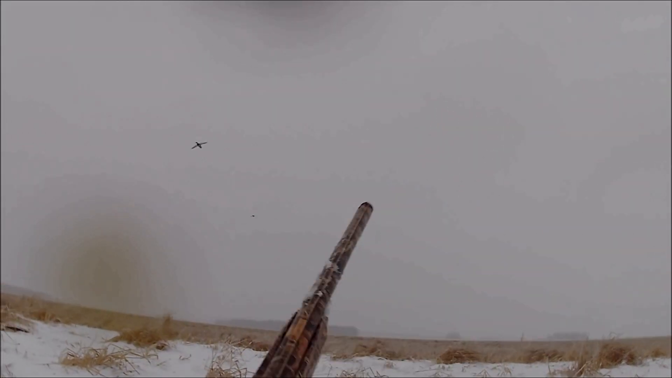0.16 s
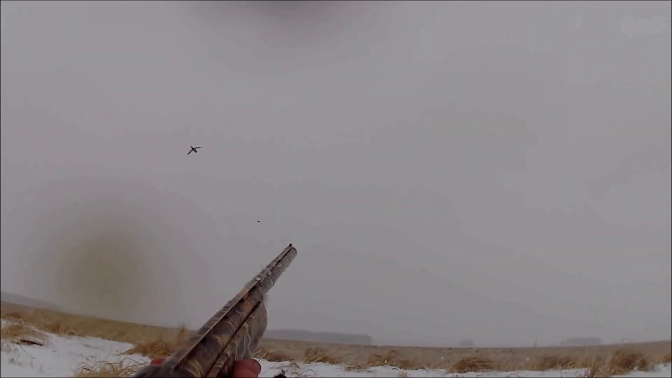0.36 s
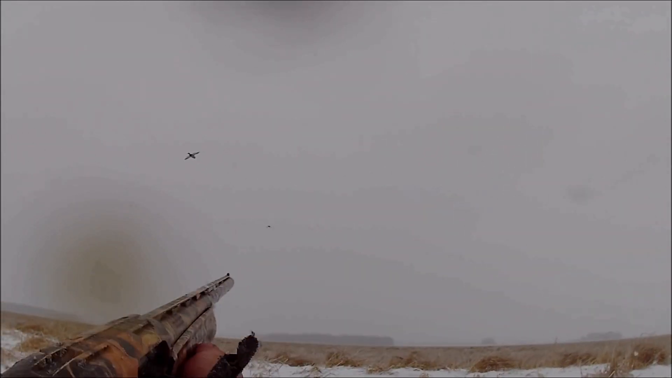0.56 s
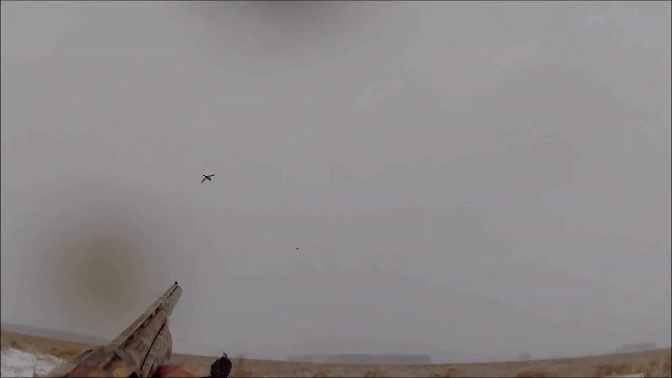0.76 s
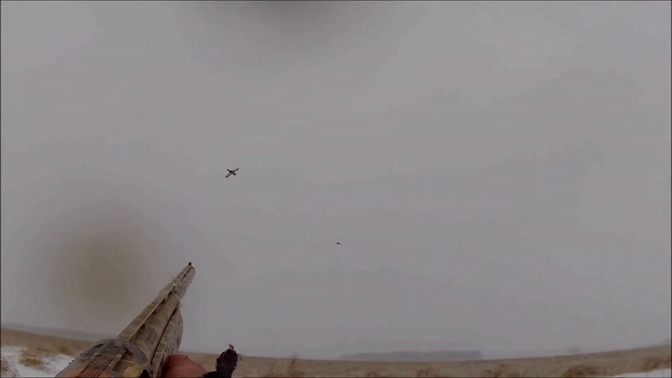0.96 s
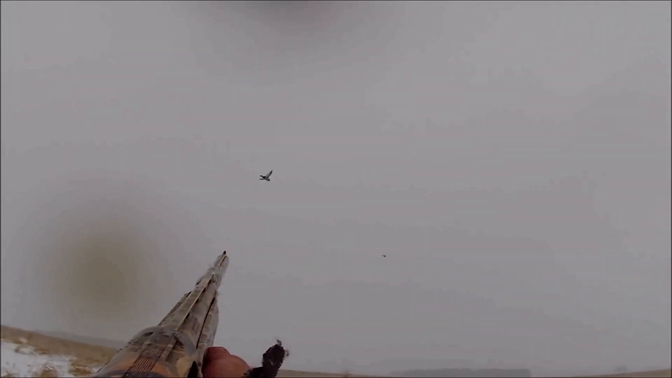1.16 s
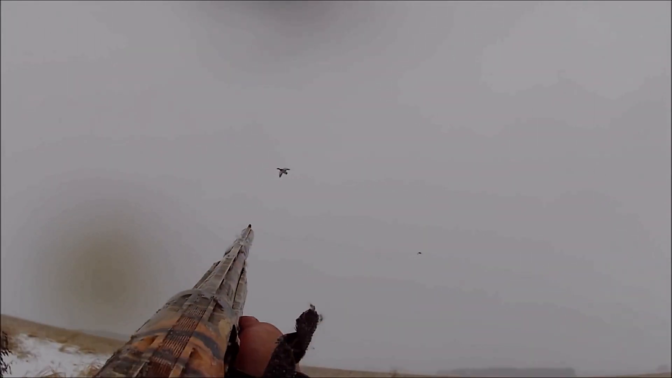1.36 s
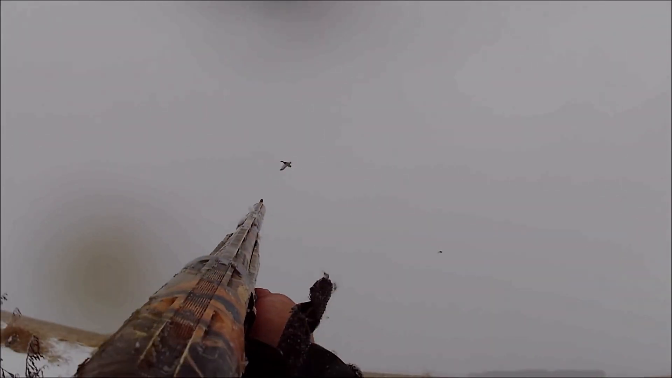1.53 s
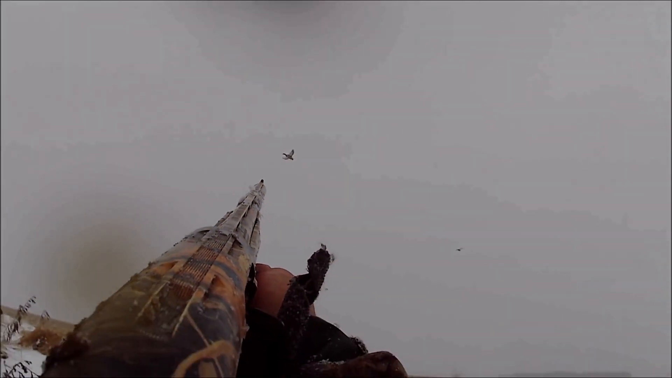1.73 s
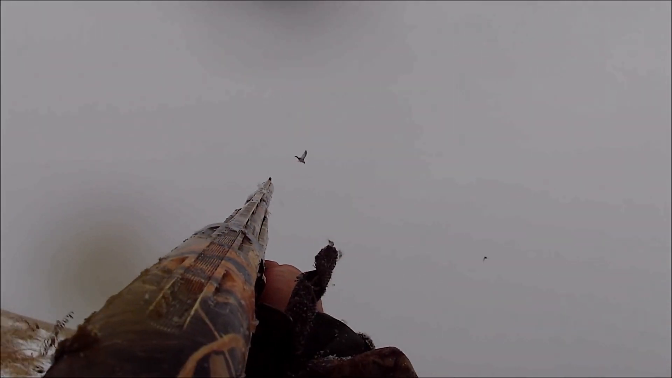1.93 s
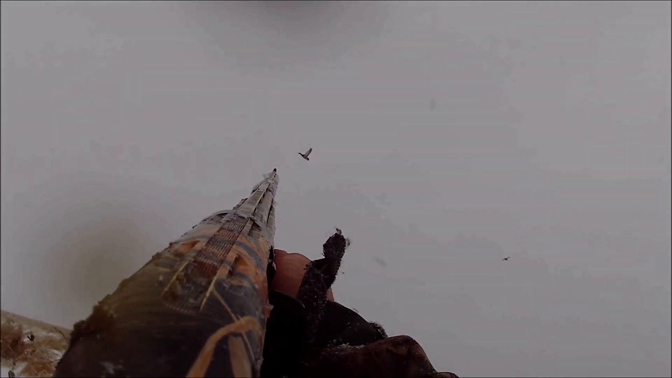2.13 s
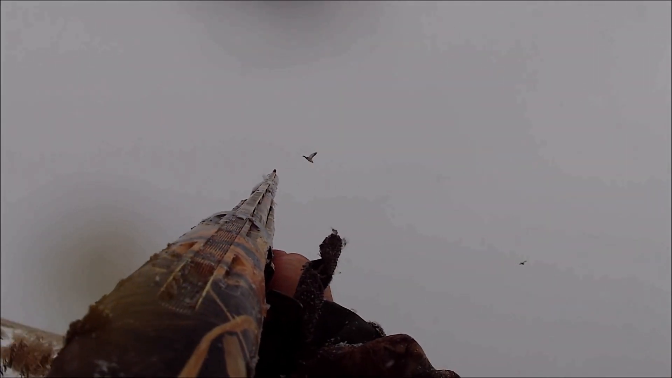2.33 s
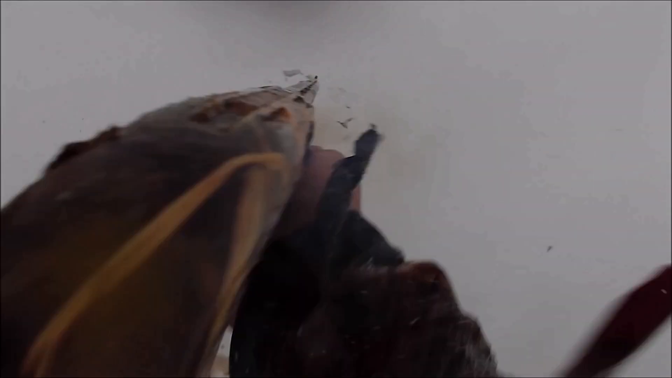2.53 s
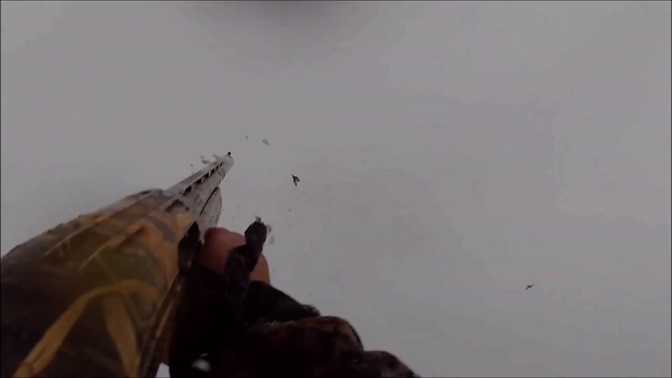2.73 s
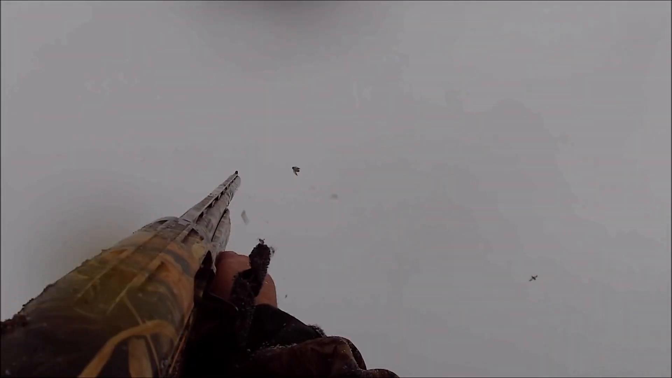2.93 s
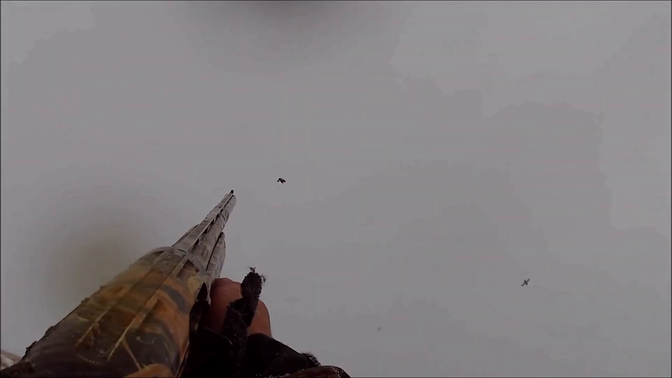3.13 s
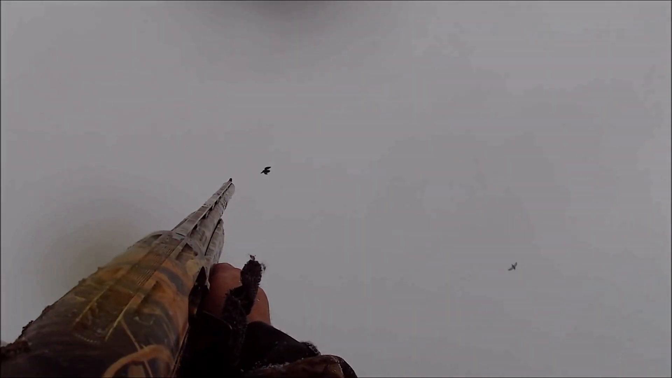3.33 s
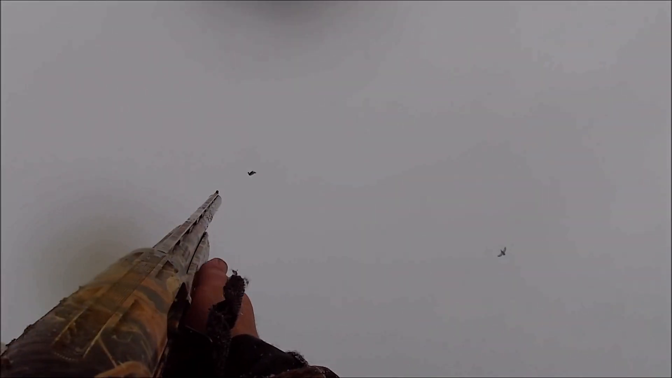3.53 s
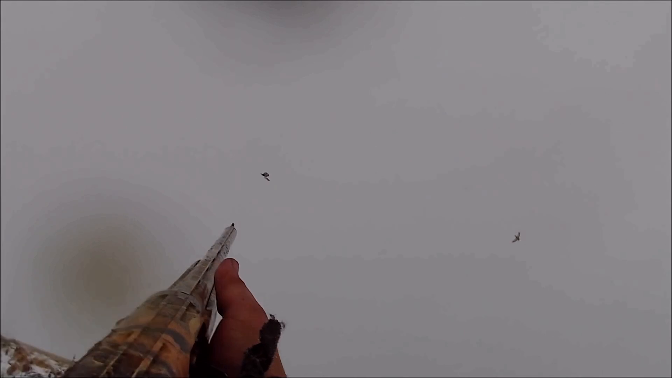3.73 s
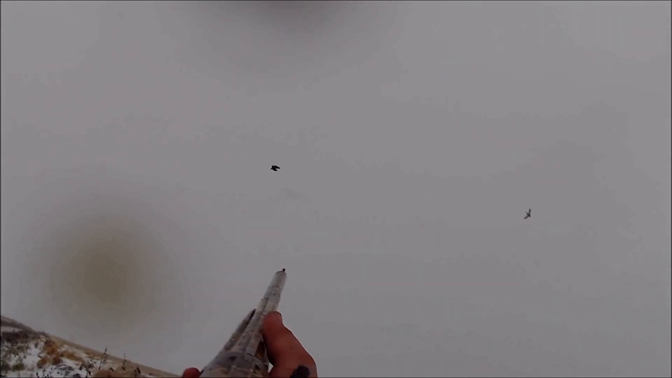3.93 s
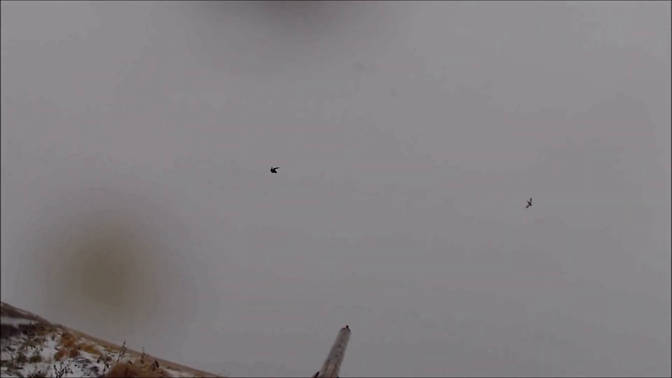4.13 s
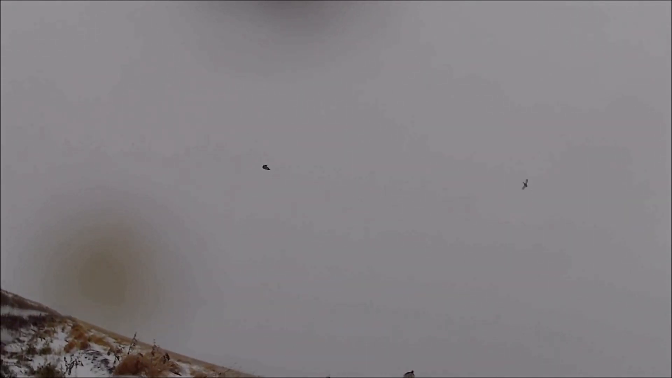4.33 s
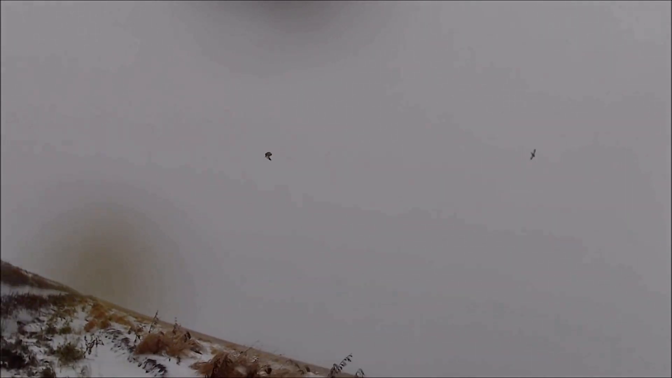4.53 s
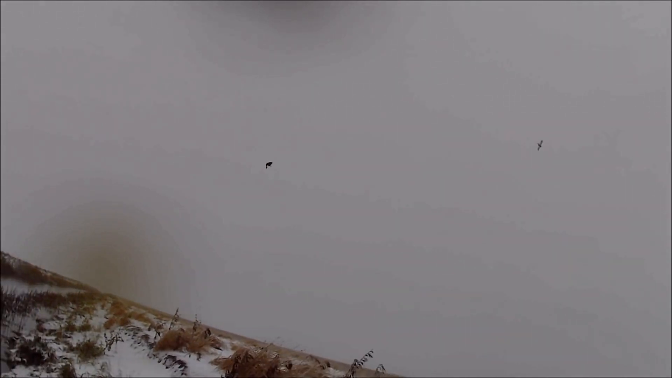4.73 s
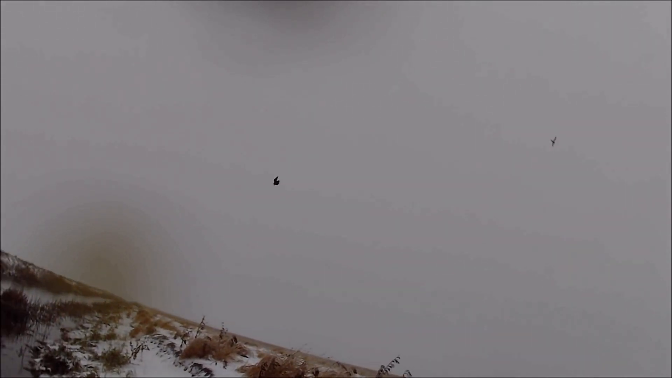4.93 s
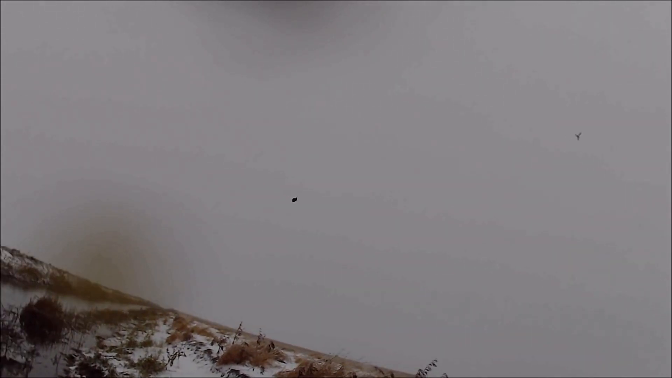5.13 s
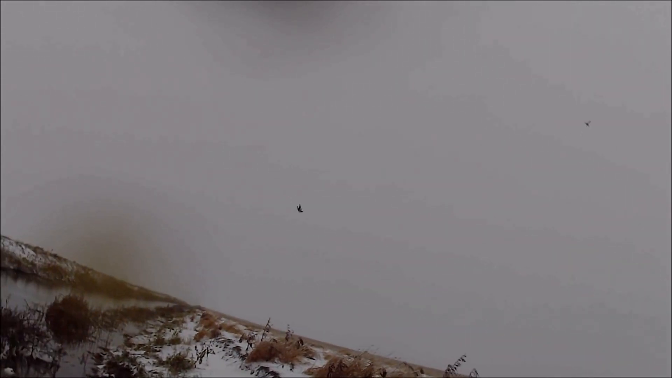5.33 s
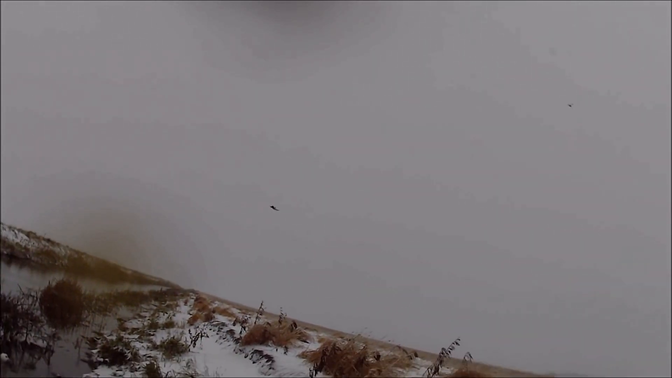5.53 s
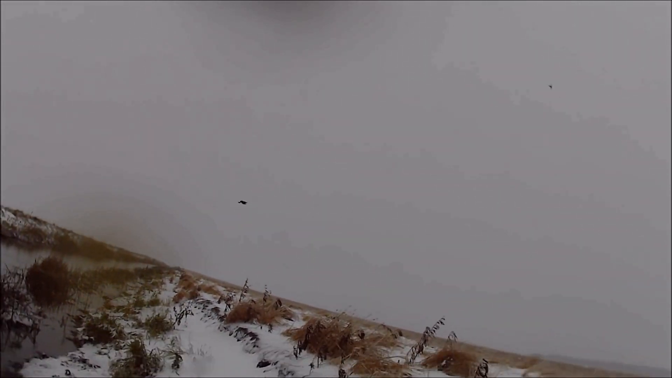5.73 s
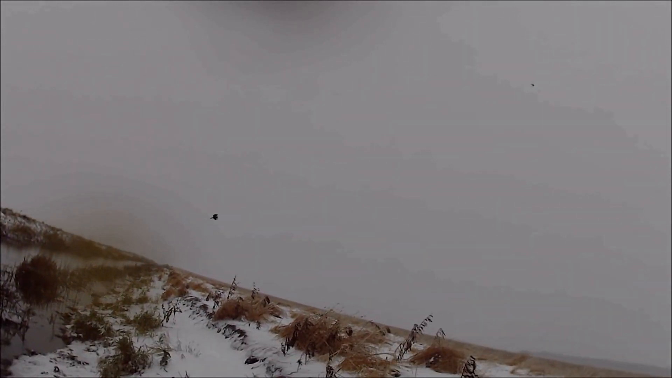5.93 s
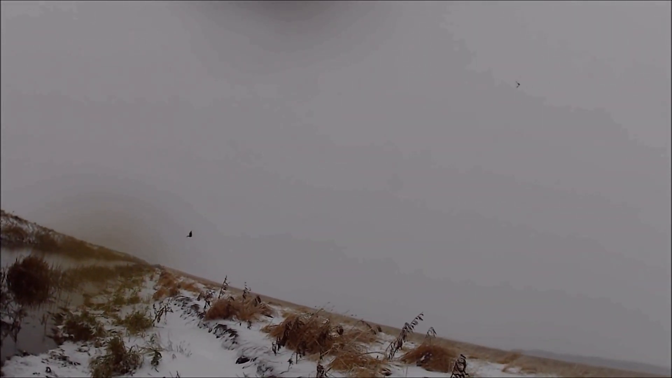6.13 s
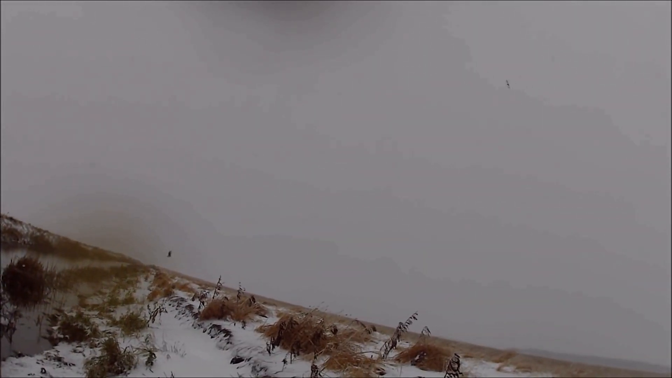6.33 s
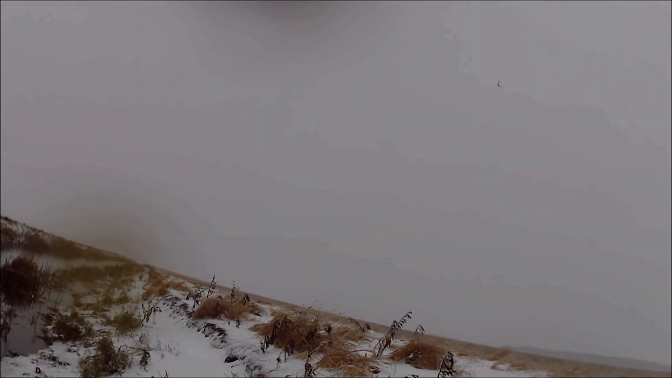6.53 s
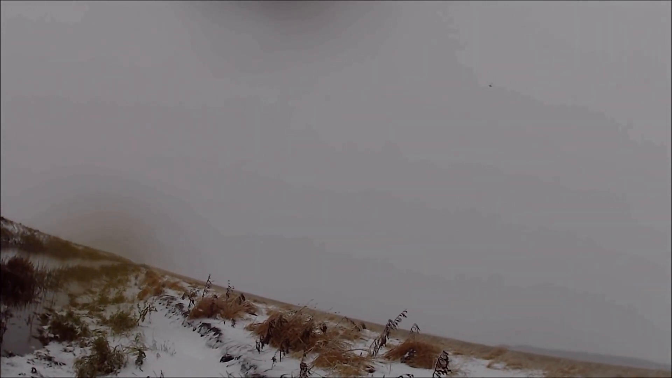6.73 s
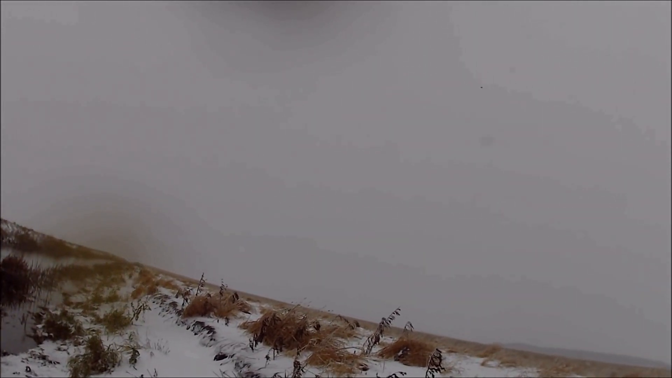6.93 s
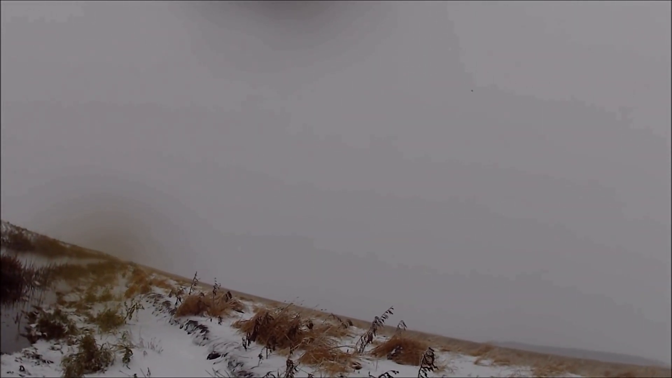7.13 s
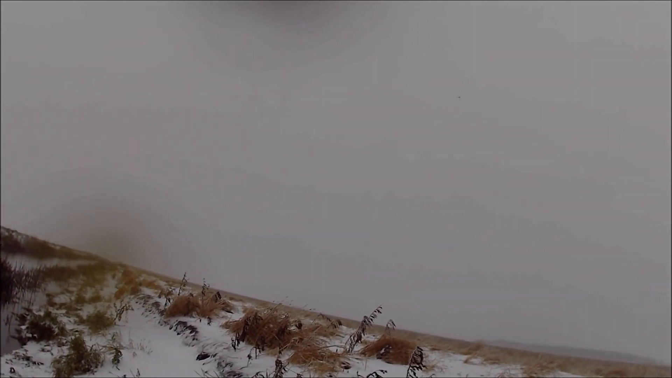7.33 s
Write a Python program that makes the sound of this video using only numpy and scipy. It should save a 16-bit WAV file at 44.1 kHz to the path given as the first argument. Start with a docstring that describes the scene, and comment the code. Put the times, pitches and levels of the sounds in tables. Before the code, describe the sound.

A single close shotgun blast cracks across an open field, heard from a microphone on the hunter's head. Before it come quiet jacket rustles and small handling knocks. After it, the self-loading action rattles briefly and the report rolls off over the land. The rest is quiet: sliding sleeves, a few light clicks, faint air and soft, low wind buffets.

```python
"""An open snowy field: a hunter swings up a self-loading shotgun and fires once by a head-worn microphone.
Under it all, faint air hisses and wind eddies bump the microphone. Sleeves rub over a jacket, and
small contacts ring the gun's body as it is handled and as the action cycles. The shot is a shock front
and a jet of muzzle gas; it overloads the recorder, scatters back off the land and rolls away."""
import sys
import numpy as np
from scipy import signal
from scipy.fft import rfft, irfft, next_fast_len
from scipy.io import wavfile
from scipy.ndimage import uniform_filter1d

SR = 44100
rng = np.random.default_rng(int(sys.argv[2]) if len(sys.argv) > 2 else 0)


def store_pcm(level_fs):
    """Save levels as 16-bit WAV."""
    pcm = np.round(np.clip(level_fs, -1, 1) * 32767).astype(np.int16)
    wavfile.write(sys.argv[1], SR, np.atleast_2d(pcm).T)


N = 329427
T = np.arange(N) / SR
SHOT_S = 2.5494   # the shock leaves the muzzle
TREBLE_HZ = 6400   # top of the main band

# tone of the still air: freq_hz, relative_db
AIR_TONE = [(88, -35.5), (150, -9.5), (268, -7), (495, -8.5), (1680, -12), (2270, -16), (2830, -16),
            (6010, -22.5), (6400, -20), (8320, -65), (14100, -120)]
# tone of the thin late hiss: freq_hz, relative_db
HISS_TONE = [(3000, -30), (6300, -6), (6700, -0.5), (12500, -1.5), (13200, -50)]
# tone of wind rumbling on the microphone: freq_hz, relative_db
WIND_TONE = [(15, 2.5), (35, 0.5), (70, -5), (130, -10.5), (250, -20.5), (500, -36), (1000, -43),
             (4000, -100)]
# swells of wind: peak_s, level_db, half_length_s
WIND_GUSTS = [(1.174, -39.5, 0.054), (3.288, -35.5, 0.24), (4.148, -44.5, 0.56), (5.337, -38.5, 0.095),
              (5.764, -36, 0.22), (6.698, -49.5, 0.49), (7.219, -38, 0.28)]
# low bumps on the microphone, one flap of the sleeve and then wind buffets: centre_s, level_db, pitch_hz
LOW_BUMPS = [(.95, -32, 292), (1.13, -30.5, 125), (3.216, -27, 168), (3.388, -25, 143), (4.342, -27.5, 153),
             (4.709, -20, 180), (5.213, -24.5, 137), (5.322, -17, 142), (5.38, -24.5, 165),
             (5.766, -21, 186), (5.837, -22, 200), (5.86, -19, 250), (6.101, -27, 89), (6.353, -26, 209),
             (6.772, -27, 101), (7.071, -24, 250.3), (7.168, -29, 234), (7.202, -19, 213.4),
             (7.3138, -20.5, 575)]
# sleeves sliding over the jacket: peak_s, level_db, rise_s, fall_s
SLEEVE_STROKES = [(.33, -40.5, 0.19, 0.45), (.5, -35, 0.041, 0.057), (.87, -36.5, 0.068, 0.065),
                  (1.25, -51.5, 0.17, 0.14), (2.52, -52, 0.05, 0.09), (3.98, -42.5, 0.14, 0.15),
                  (4.111, -38.5, 0.15, 0.1), (4.359, -41.5, 0.069, 0.16), (4.575, -39.5, 0.15, 0.042),
                  (5.021, -40.5, 0.32, 0.47), (6.5, -55.5, 0.74, 0.64), (6.95, -50, 0.058, 0.06)]
# tone of the cloth as the gun goes up: freq_hz, relative_db
CLOTH_UP_TONE = [(120, -35), (200, -10.5), (438, -7.5), (477, -4), (552, -6), (676, -3), (1140, -9),
                 (1260, -4.5), (1710, -6.5), (2130, -1), (3970, -14), (6400, -15.5), (8320, -44.5),
                 (14100, -120)]
# tone of the cloth as the gun comes down: freq_hz, relative_db
CLOTH_DOWN_TONE = [(180, -44.5), (300, -11), (383, -10.5), (664, -3.5), (1290, -6), (1590, -0.5),
                   (1800, -4), (2130, -1), (2580, -2.5), (2820, -4), (3930, -14.5), (6400, -13),
                   (8320, -98), (14100, -120)]
# ringing modes of the gun's body: pitch_hz, relative_db, t60_s
GUN_MODES = [(620, -5.5, .021), (840, -12.5, .016), (1440, -4.5, 0.0086), (1790, -0.5, 0.0088),
             (2320, -1.5, .01), (2720, 7.5, 0.018), (3057, 6.5, 0.0087), (3682, -2.5, 0.0083),
             (4480, -7, .011), (5600, -20.5, .0076)]
# bolt, shell and handling contacts: start_s, level_db, brightest_hz, chatter_s
GUN_CONTACTS = [(0.6088, -21.5, 3900, .0009), (1.206, -28.5, 710, 0.0024), (1.214, -23, 2520, 0.0019),
                (1.246, -33.5, 900, 0.0031), (1.427, -33, 735, 0.0015), (1.458, -31.5, 920, 0.0018),
                (1.501, -39.5, 2170, 0.001), (1.538, -29, 1620, 0.0006), (1.569, -29, 1790, 0.00077),
                (2.604, -7.5, 1216, .0014), (2.778, -14.5, 2170, .0028), (2.7872, -12, 2070, 0.0047),
                (2.7942, -9, 1950, .0045), (3.3573, -13.5, 3000, .003), (3.431, -28, 2620, 0.0022),
                (3.699, -34, 2940, .0021), (3.718, -28.5, 2210, 0.0012), (3.764, -30.5, 2580, 0.0062),
                (5.575, -31.5, 2710, 0.0015), (5.947, -28, 755, 0.0071), (6.252, -37, 1680, .0025)]
# swells after the shot, its echo and then the rasp of the action sliding: peak_s, level_db, rise_s, fall_s
TAIL_SWELLS = [(2.607, -20.5, 0.015, 0.032), (2.67, -32.5, 0.037, 0.085), (2.792, -26.5, 0.051, .028),
               (2.86, -36, 0.028, 0.016)]
# tone of the noise after the shot: freq_hz, relative_db
TAIL_TONE = [(120, -41), (200, -9), (275, -16.5), (395, -8.5), (717, -8.5), (1060, -7.5), (1610, -5),
             (2130, -3), (3280, -12), (6400, -12), (8320, -47), (14100, -120)]
# narrow peaks that colour the blast: centre_hz, width_hz, boost_db
BLAST_PEAKS = [(434, 90, 16.5), (708, 76, 11), (1000, 71, 6), (1480, 140, 1.5), (2000, 170, 3.5)]
# tone of the turbulent muzzle gas: freq_hz, relative_db
GAS_TONE = [(60, -6.5), (140, 0), (270, -8.5), (600, -2), (1100, 2), (2200, 2.5), (3000, -3.5), (4500, -3),
            (6300, -10)]


def from_db(db):
    """Decibels to gain."""
    return 10 ** (np.asarray(db) / 20)


def rms_one(x):
    """Scale to unit rms."""
    return x / np.sqrt(np.mean(x ** 2) + 1e-20)


def lowpass(x, hz, order=2):
    """Butterworth low-pass."""
    return signal.sosfilt(signal.butter(order, min(hz, .45 * SR), fs=SR, output="sos"), x + 1e-18)


def highpass(x, hz, order=2):
    """Butterworth high-pass."""
    return signal.sosfilt(signal.butter(order, hz, "high", fs=SR, output="sos"), x)


def bandpass(x, hz, ratio):
    """Gentle band from hz / ratio to hz * ratio."""
    return signal.sosfilt(signal.butter(1, [hz / ratio, hz * ratio], "band", fs=SR, output="sos"), x)


def colour(x, tone):
    """Equalise x along (freq_hz, relative_db) points and scale to unit rms."""
    hz, db = np.transpose(tone)
    size = next_fast_len(N)
    bin_hz = np.maximum(np.arange(size // 2 + 1) * SR / size, 1)
    curve = from_db(np.interp(np.log(bin_hz), np.log(hz), db))
    return rms_one(irfft(rfft(x, size) * curve, size)[:N])


def noise():
    """White noise."""
    return rng.standard_normal(N)


def drift(rate_hz):
    """A wobble that glides between random values."""
    count = int(N / SR * rate_hz) + 2
    return np.interp(T * rate_hz, np.arange(count), rng.standard_normal(count))


def swell(peak_s, db, rise_s, fall_s):
    """Gain that grows to a rounded peak and dies away."""
    away = np.maximum((peak_s - T) / rise_s, (T - peak_s) / fall_s)
    return from_db(db) * np.exp(-np.minimum(np.abs(away) ** 1.27, 20))


def together(gains):
    """Unrelated sounds add in power."""
    return np.sqrt(sum(gain ** 2 for gain in gains))


def after_shot(hold_s, release_s):
    """Gain that jumps to 1 with the shot, holds and decays."""
    return (T >= SHOT_S) * np.exp(-np.clip((T - SHOT_S - hold_s) / release_s, 0, 20))


def field_air(level_db=-58):
    """The bed: a faint steady hiss over the field."""
    return from_db(level_db) * colour(noise(), AIR_TONE)


def late_hiss(start_s=7.165, level_db=-68):
    """A thin bright hiss opens up near the end."""
    return from_db(level_db) * (T >= start_s) * colour(noise(), HISS_TONE)


def air_bumps(bumps, wake_db=-15, wake_cycles=8, roundness=2.5):
    """Each bump is one quick pressure swing inside a wake that is shorter at higher pitch."""
    out, t = np.zeros(N + SR), np.arange(-SR // 20, SR // 20) / SR
    for centre_s, db, hz in bumps:
        lean = np.exp(2j * np.pi * rng.random())   # random phase tilts the swing
        swing = np.real(lean / (1 - 2j * np.pi * hz * t / roundness) ** (roundness + 1))
        churn = rms_one(lowpass(rng.standard_normal(len(t)), hz, order=3))
        wake = from_db(wake_db) * churn * np.exp(-np.abs(t) * hz / wake_cycles)
        at = round(centre_s * SR)
        out[at:at + len(t)] += from_db(db) * (swing + wake) * np.hanning(len(t))
    return out[len(t) // 2:][:N]


def wind_and_flap(breeze_db=-49.5, lumpy_db=4, eddies_per_s=18, eddy_over_gust_db=6.5, eddy_hz=148):
    """Lumpy rumble whose gusts carry small random eddies, plus one sleeve flap and harder wind buffets."""
    gust = together(swell(peak_s, db, half_s, half_s) for peak_s, db, half_s in WIND_GUSTS)
    strength = together([gust, from_db(breeze_db)])
    rumble = strength * colour(noise(), WIND_TONE) * from_db(lumpy_db * drift(25))
    flap_and_buffets = air_bumps(LOW_BUMPS)
    eddies = [(rng.uniform(0, T[-1]), rng.normal(eddy_over_gust_db, 2), eddy_hz * 2 ** rng.normal(0, .35))
              for _ in range(int(eddies_per_s * T[-1]))]
    return rumble + flap_and_buffets + gust * air_bumps(eddies)


def jacket(rubbing, tone, snags_per_s=1100, snag_db=-2, uneven_db=1.5, fold_depth=.4):
    """Friction of the weave plus threads that snag and let go; moving folds shift its resonances."""
    snags = (rng.random(N) < snags_per_s / SR) * noise()
    friction = colour(noise() + from_db(snag_db) * rms_one(snags), tone)
    folds = sum(drift(11) * bandpass(friction, hz, ratio=1.045) for hz in np.geomspace(900, 3800, 10))
    return rubbing * from_db(uneven_db * drift(70)) * (friction + fold_depth * folds)


def gun_clicks(snap_db=.5, focus_db=10.5, scatter_db=-26, scatter_s=.045, headroom_db=5):
    """Each contact chatters briefly and rings the gun's modes, most strongly near its own pitch."""
    out, t = np.zeros(N), np.arange(SR // 10) / SR
    mode_hz, mode_db, t60_s = np.transpose(GUN_MODES)[:, :, None]
    for start_s, db, hz, chatter_s in GUN_CONTACTS:
        chatter = np.exp(-t / chatter_s) + from_db(scatter_db) * np.exp(-t / scatter_s)
        force = rng.standard_normal(len(t)) * chatter
        strength_db = mode_db - focus_db * np.log2(mode_hz / hz) ** 2 + rng.normal(0, .67, mode_hz.shape)
        body = np.sum(from_db(strength_db - 60 * t / t60_s) * np.sin(2 * np.pi * mode_hz * t), axis=0)
        ring = rms_one(signal.fftconvolve(force, body)[:len(t)])
        snap = from_db(snap_db) * rms_one(bandpass(force, hz, ratio=1.37))
        hit = lowpass(ring + snap, TREBLE_HZ, order=4)
        loudest_rms = np.sqrt(uniform_filter1d(hit ** 2, size=90).max())
        at = round(start_s * SR)
        out[at:at + len(t)] += from_db(db - headroom_db) * hit / loudest_rms
    return out


def shot_tail(patchy_db=2, dull_hz=2200, dull_s=.54, boom_db=-15, boom_hz=200, roll_db=-47):
    """Patchy noise over a low boom, dulling with time: echo off the land, then the action's sliding rasp."""
    wash = colour(noise(), TAIL_TONE) * from_db(patchy_db * drift(120))
    dull_wash = rms_one(lowpass(wash, dull_hz, order=1))
    dullness = np.clip((T - SHOT_S) / dull_s, 0, 1) ** 2
    boom = from_db(boom_db) * rms_one(lowpass(noise(), boom_hz))
    roll = from_db(roll_db) * after_shot(hold_s=.93, release_s=.27)   # the report rolls over the field
    strength = together([roll] + [swell(*row) for row in TAIL_SWELLS])
    return strength * ((1 - dullness) * wash + dullness * dull_wash + boom)


def gas_flow(hold_s=.0228, afterflow_db=-13.5):
    """Envelope of the muzzle gas: a full jet stops abruptly, then the last gas trails out."""
    jet = after_shot(hold_s, release_s=.0004)
    afterflow = from_db(afterflow_db) * after_shot(hold_s, release_s=.008)
    return np.maximum(jet, afterflow)


def gas_thump(start_s=2.5562, pitch_hz=145, decay_s=.0052, level_db=-3):
    """The ball of muzzle gas overshoots and swings back a few times."""
    age = np.maximum(T - start_s, 0)
    return from_db(level_db) * np.exp(-age / decay_s) * np.sin(2 * np.pi * pitch_hz * age) * gas_flow()


def pressure_step(delay_s=.0052, rise_s=.0025, decay_s=.106, coupling_hz=.25, low_cut_hz=1.14):
    """The gas shoves the diaphragm aside; the microphone's bass cuts make it swing back slowly."""
    age = np.maximum(T - SHOT_S - delay_s, 0)
    step = np.minimum(age / rise_s, 1) * np.exp(-age / decay_s)
    for _ in range(2):
        step = highpass(step, coupling_hz, order=1)
    return highpass(step, low_cut_hz)


def blast_tone():
    """The broad tone of the gas, coloured by a few narrow peaks."""
    hz = np.geomspace(30, SR / 2, 400)
    gas_hz, gas_db = np.transpose(GAS_TONE)
    db = np.interp(np.log(hz), np.log(gas_hz), gas_db)
    for centre_hz, width_hz, boost_db in BLAST_PEAKS:
        db += boost_db / (1 + (2 * (hz - centre_hz) / width_hz) ** 2)
    return np.column_stack([hz, db])


def muzzle_blast(gas_db=-1, crack_db=7, crack_hz=2300, roar_db=2, roar_hz=1150):
    """A bright shock crack, then the lower roar of the widening jet, riding on a pressure step."""
    # a shock holds every frequency evenly; turbulence only scrambles their arrival
    phases = np.exp(2j * np.pi * rng.random(551))
    shock = np.resize(irfft(phases), N)
    gas = from_db(gas_db) * gas_flow() * colour(shock, blast_tone())
    front = from_db(crack_db) * after_shot(hold_s=0, release_s=.0027)
    crack = front * rms_one(bandpass(shock, crack_hz, ratio=1.25))
    widening = swell(SHOT_S + .0105, roar_db, rise_s=.0028, fall_s=.0028) * gas_flow()
    roar = widening * rms_one(bandpass(shock, roar_hz, ratio=1.2))
    return crack + roar + gas + pressure_step()


def scene():
    """The mono mix at the microphone; the jacket has one tone before the shot and another after."""
    air = field_air()
    rubbing = together(swell(*stroke) for stroke in SLEEVE_STROKES)
    sleeves_up = jacket(rubbing * (T < SHOT_S), CLOTH_UP_TONE)
    sleeves_down = jacket(rubbing * (T >= SHOT_S), CLOTH_DOWN_TONE)
    shot = muzzle_blast() + gas_thump() + shot_tail()
    return (shot + gun_clicks() + sleeves_up + sleeves_down + air + wind_and_flap())[None]


def record(dry, hardness=10, ceiling_db=-.53, shelf_db=-7, cutoff_hz=15700):
    """A narrow-band recorder overloads on the blast; a shelf softens the fizz and the late hiss joins."""
    narrow = signal.sosfilt(signal.ellip(12, .2, 80, TREBLE_HZ, fs=SR, output="sos"), dry)
    crushed = narrow / (1 + np.abs(narrow / from_db(ceiling_db)) ** hardness) ** (1 / hardness)
    low_taps = signal.firwin(41, TREBLE_HZ, fs=SR)
    high_taps = signal.unit_impulse(len(low_taps), "mid") - low_taps
    softened = signal.lfilter(low_taps + from_db(shelf_db) * high_taps, 1, crushed)
    top_cut = signal.ellip(12, .2, 90, cutoff_hz, fs=SR, output="sos")
    return signal.sosfilt(top_cut, softened + late_hiss())


dry = scene()
out = record(dry)
store_pcm(out)
```